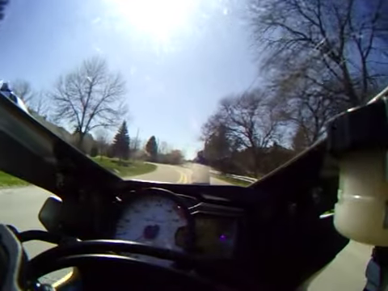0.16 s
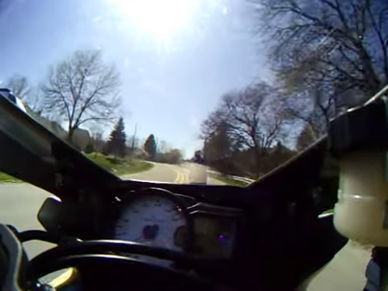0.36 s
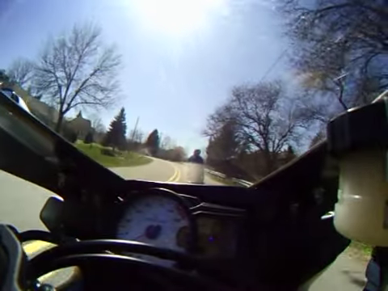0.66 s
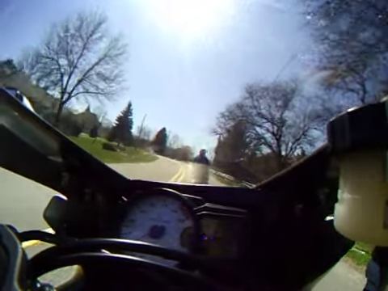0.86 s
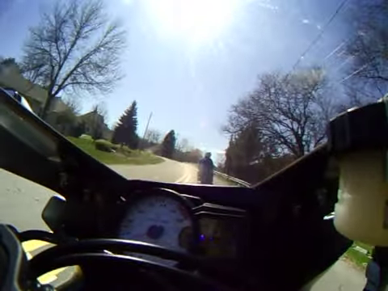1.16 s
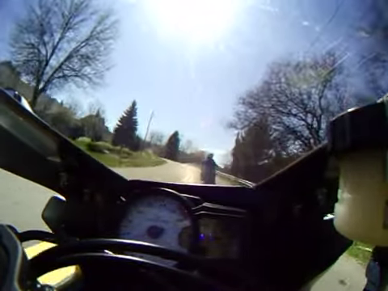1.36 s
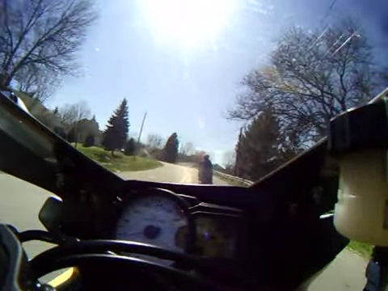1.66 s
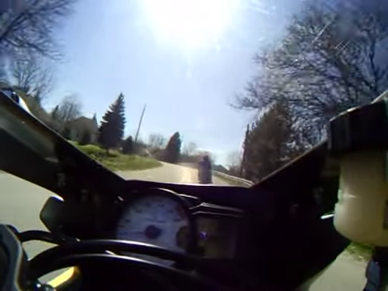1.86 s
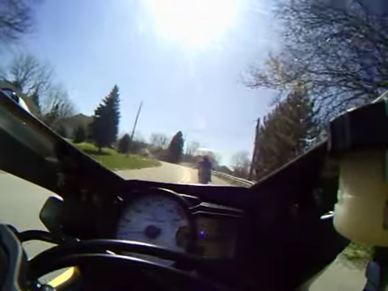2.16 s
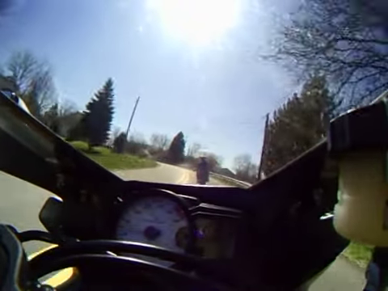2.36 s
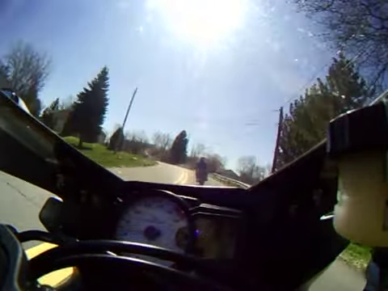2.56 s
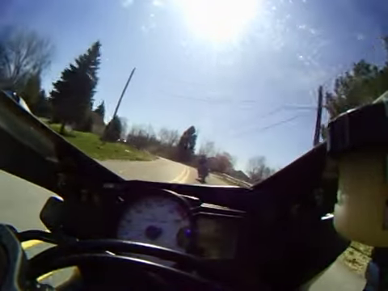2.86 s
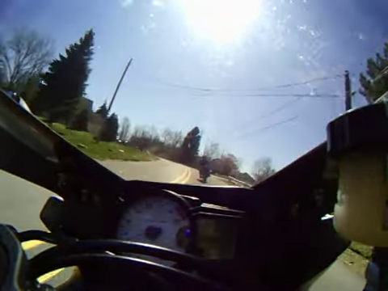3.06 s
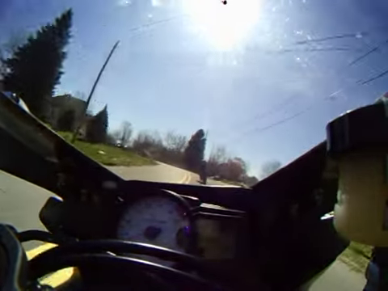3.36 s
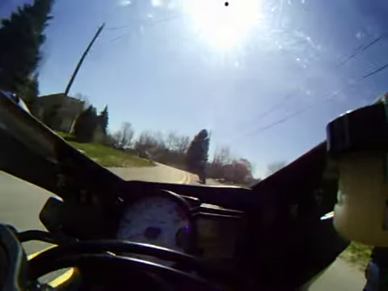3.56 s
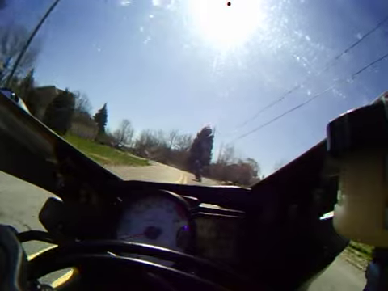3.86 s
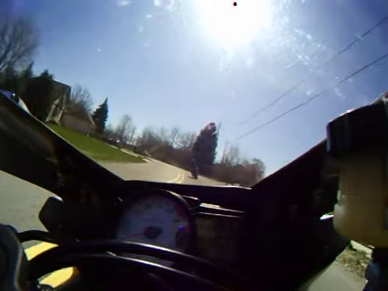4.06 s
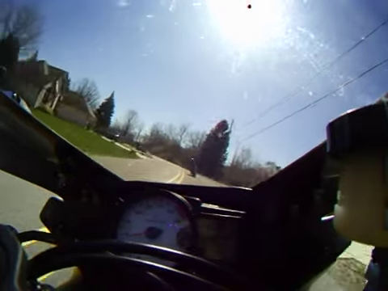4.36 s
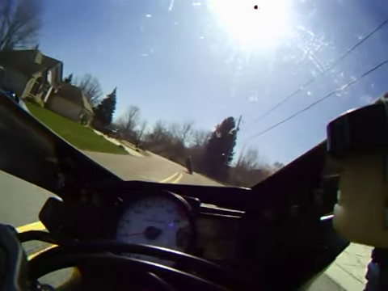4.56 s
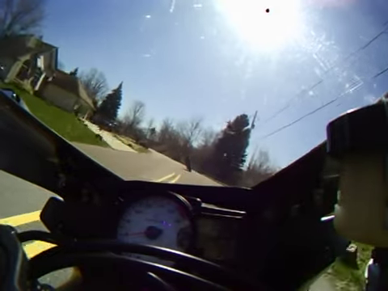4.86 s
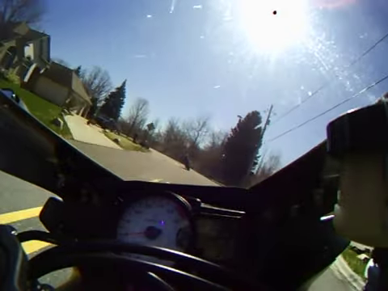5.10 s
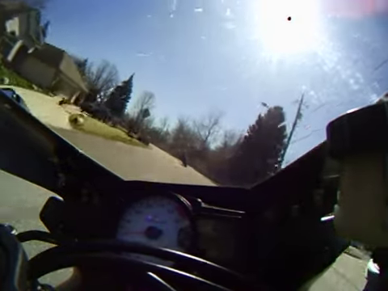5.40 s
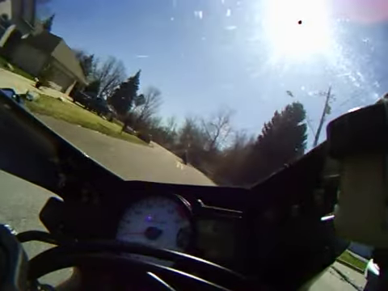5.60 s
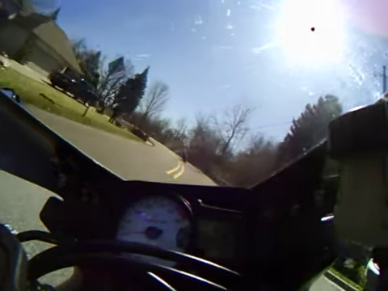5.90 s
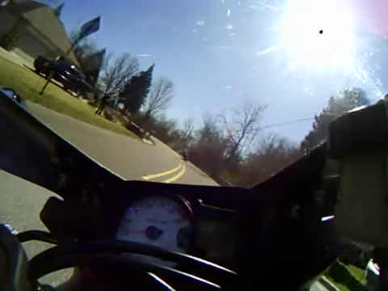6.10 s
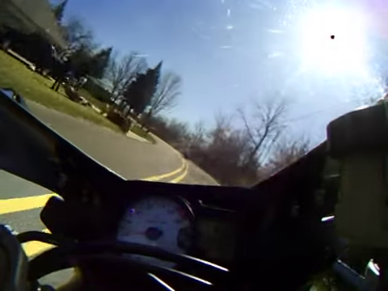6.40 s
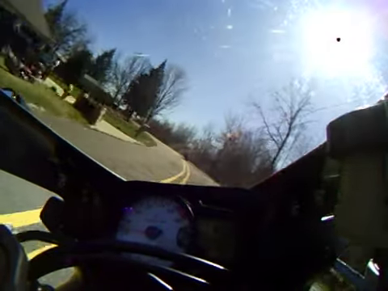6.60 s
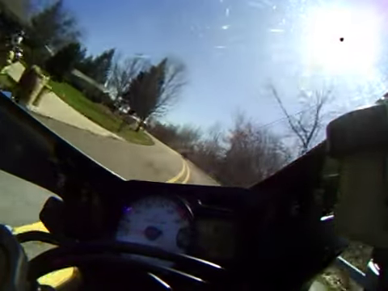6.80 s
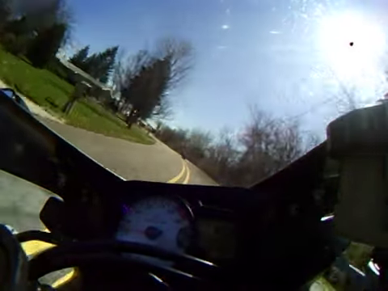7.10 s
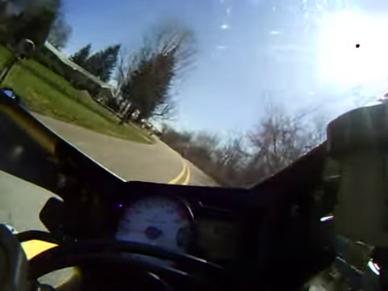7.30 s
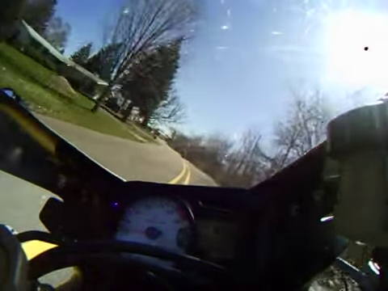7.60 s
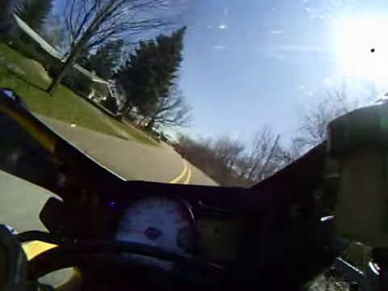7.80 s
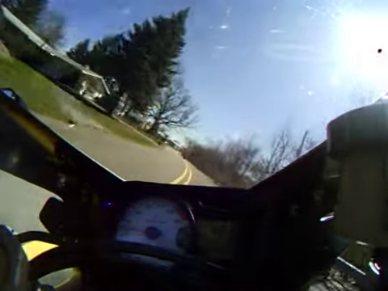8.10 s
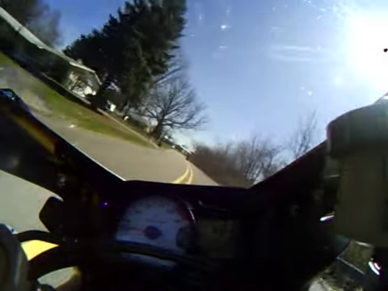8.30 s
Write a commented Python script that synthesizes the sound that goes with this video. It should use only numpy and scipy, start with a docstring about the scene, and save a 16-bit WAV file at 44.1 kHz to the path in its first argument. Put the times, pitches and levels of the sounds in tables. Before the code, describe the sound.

A sport motorcycle growls away from low revs, climbs, shifts up near three seconds, then pulls harder with buzzing, rattling surges and wind.

```python
"""A growl and a low throb open the scene: an inline-four sport motorcycle pulls away, shifts up near 2.8 s
and gathers speed again, heard from behind its windscreen. Each firing is a pulse that rings the airbox, over
a boom at the firing rate; the valve gear whirs as filtered tick noise; surges of vibration set the camera
mount buzzing by impacts. Wind is coloured noise; a narrow-band recorder rounds the peaks."""
import sys
import numpy as np
from scipy import signal
from scipy.fft import rfft, irfft, next_fast_len
from scipy.io import wavfile
from scipy.ndimage import uniform_filter1d

SR = 44100
rng = np.random.default_rng(int(sys.argv[2]) if len(sys.argv) > 2 else 0)


def generate_wav(sig):
    """Save sig (samples, or channels by samples) to the path in sys.argv[1] as 16-bit PCM at SR."""
    pcm = np.round(np.clip(np.atleast_2d(sig).T, -1, 1) * 32767).astype(np.int16)
    wavfile.write(sys.argv[1], SR, pcm)


N = 372644

# strength of the four cylinders in firing order: (in the airbox [dB], in the mount [dB])
CYLINDER_STRENGTHS = [(-1.2, 3), (0, 6), (1, -6), (-2, -1)]
AIRBOX_STRENGTHS, MOUNT_STRENGTHS = 10 ** (np.transpose(CYLINDER_STRENGTHS) / 20)  # as gains
FIRINGS = len(CYLINDER_STRENGTHS)  # firings in one engine cycle
# the upshift, revs drop and the clutch snatches: (time [s], firing rate [Hz], share of ragged firing [0-1])
UPSHIFT_COURSE = [(2.83, 190.9, .05), (2.92, 165.4, 0.5), (3.05, 152.4, 0.4), (3.13, 174.5, .45),
                  (3.2, 157.1, 0.2)]


def undb(db):
    """Level law: decibels to amplitude gain."""
    return 10 ** (np.asarray(db) / 20)


def unit(x):
    """Normalisation: scale to rms 1."""
    return x / np.sqrt(np.mean(x ** 2))


def curves(table):
    """Linear interpolation: each column of a table, joined by straight lines in time."""
    s, *columns = np.transpose(table)
    return [np.interp(np.arange(N) / SR, s, c) for c in columns]


def walk(rate):
    """Slow random modulation: random levels held 1 / rate s, then smoothed by two moving averages."""
    hold = int(SR / rate)
    steps = np.repeat(rng.standard_normal(N // hold + 1), hold)
    return unit(uniform_filter1d(uniform_filter1d(steps, hold), hold)[:N])


def colour(x, points):
    """Minimum-phase filtering: folding the cepstrum makes a causal filter through (Hz, dB) points."""
    size = next_fast_len(N + SR // 2, True) // 2 * 2
    hz, db = np.transpose(points)
    f = np.arange(size // 2 + 1) * SR / size
    gain = undb(np.interp(np.log(f + 1), np.log(hz), db))
    cepstrum = irfft(np.log(gain))
    cepstrum[1:size // 2] *= 2
    cepstrum[size // 2 + 1:] = 0
    return unit(irfft(rfft(x, size) * np.exp(rfft(cepstrum)))[:N])


def resonate(x, modes):
    """Modal superposition: parallel resonances with steep skirts; neighbours swing in opposite sense."""
    total = np.zeros(N)
    for k, (hz, width, db) in enumerate(modes):
        stage = np.concatenate(signal.iirpeak(hz, hz / width, fs=SR))
        total += (-1) ** k * undb(db) * signal.sosfilt([stage] * 2, x)
    return unit(total)


def knocks(phase, sizes, scatter_db, jitter_ms):
    """Impulse train: one pulse a turn of the phase; the sizes repeat, each a little off in size and time."""
    k = np.arange(1, int(phase[-1]))
    chance = rng.standard_normal((len(k), 2))
    jitter = chance[:, 1] * jitter_ms * SR / 10 ** 3
    at = np.clip(np.interp(k, phase, np.arange(N)) + jitter, 0, N - 2)
    size = sizes[k % len(sizes)] * undb(scatter_db * chance[:, 0])
    i = at.astype(int)
    part = at - i  # a pulse between two samples is shared by both
    return np.bincount(i, size * (1 - part), N) + np.bincount(i + 1, size * part, N)


def chatter(pulses, decay_ms, steady):
    """Amplitude-modulated noise: a decaying burst of noise after each pulse, over a steady share."""
    envelope = signal.lfilter([1], [1, -np.exp(-10 ** 3 / (decay_ms * SR))], pulses)
    return unit((unit(envelope) + steady) * rng.standard_normal(N))


def swings(phase, sizes, rebound, scatter_db, jitter_ms):
    """Half-wave antisymmetry: a push and, half a period later, a pull favour the odd harmonics."""
    return knocks(2 * phase, np.outer(sizes, [1, -rebound]).ravel(), scatter_db, jitter_ms)


def lilt(phase, depth):
    """Phase modulation: the crank hurries and lags once in each engine cycle, which splits the harmonics."""
    return phase + depth * np.sin(2 * np.pi * phase / FIRINGS)


def rattle(phase, scatter_db, jitter_ms, count=12):
    """Cyclic repetition: a dense run of small contacts comes round much alike in every engine cycle."""
    sizes = rng.standard_normal(count * FIRINGS)
    return unit(knocks(count * phase, sizes, scatter_db, jitter_ms))


def gearbox():
    """The firing rate climbs, drops at the upshift and climbs again; firings are ragged only in the shift."""
    # engine speed in the lower gear: (time [s], firing rate [Hz])
    low_gear = [(0, 116.9), (.4, 131.6), (.75, 146.3), (1.5, 172.5), (2.2, 194.6), (2.5, 207.9),
                (2.7, 210.8), (2.76, 210.1)]
    # engine speed in the higher gear: (time [s], firing rate [Hz])
    high_gear = [(3.26, 160.1), (3.7, 165.9), (4.4, 175), (5.8, 194.5), (6.4, 200.3), (6.9, 202.6),
                 (7.6, 210.3), (8.45, 223.1)]
    driving = lambda gear: [(s, hz, 0) for s, hz in gear]
    hz, ragged = curves(driving(low_gear) + list(UPSHIFT_COURSE) + driving(high_gear))
    return hz, np.clip(ragged, 0, 1)


def pull_away(phase):
    """Subharmonics of load: the intake resonates to a growl; uneven firings throb below the firing tone."""
    # pulling hard from low revs: (time [s], intake growl [dB], lugging throb before its parts are mixed [dB])
    pull = [(0, -32, -25.5), (.35, -27, -32), (.85, -28.5, -33), (1.15, -34.5, -44), (2.2, -43.5, -46),
            (3, -57, -62)]
    # intake resonances: (centre [Hz], width of each of two stages [Hz], relative level [dB])
    intake = [(329, 63, -5), (626, 67, -2), (960, 120, -4), (1067, 110, -1), (1508, 140, -7.5),
              (2384, 190, -7), (2750, 160, -16.5)]
    growl_db, throb_db = curves(pull)
    gulps = unit(swings(phase, AIRBOX_STRENGTHS, rebound=0.63, scatter_db=3.5, jitter_ms=0.013))
    gulps = gulps + undb(-5.5) * rattle(phase, scatter_db=4.0, jitter_ms=0.045)
    three_per_cycle = np.sqrt(2) * np.sin(2 * np.pi * phase * 3 / FIRINGS)
    rumble_colour = [(45, -37.0), (66, -11.5), (74, -0.5), (84, -13), (130, -35.5), (400, -67.0)]
    rumble = colour(rng.standard_normal(N), rumble_colour)
    throb = undb(-5) * three_per_cycle + undb(-2.0) * rumble
    return undb(growl_db) * resonate(gulps, intake) + undb(throb_db) * throb


def engine(phase, ragged, lean, loose, boom, airbox):
    """Forced resonance: each firing rings the airbox, over a tone lopsided by load; roughness turns to roar."""
    # airbox and pipe resonances: (centre [Hz], width of each of two stages [Hz], relative level [dB])
    airbox_modes = [(325, 43, -19), (567.4, 68, 1.5), (656.2, 78, -5), (949, 67, -7.5), (1018, 40, -14),
                    (1490, 570, -16.5), (2375, 110, -13)]
    loose_roughness = .1  # share of the pulse power that the loose mount breaks into roar
    pulses = unit(knocks(lilt(phase, depth=0.014), AIRBOX_STRENGTHS, scatter_db=0.6, jitter_ms=0.03))
    rough = np.maximum(ragged, loose_roughness * loose)
    gas = np.sqrt(1 - rough) * pulses + np.sqrt(rough) * rng.standard_normal(N)
    turn = 2 * np.pi * phase
    lopsided = np.sin(turn) + undb(-7) * lean * np.sin(2 * turn)
    tone = boom * (1 - ragged) * np.sqrt(2) * lopsided
    return airbox * undb(1.4 * walk(18)) * resonate(gas, airbox_modes) + tone


def wind(loose):
    """Turbulence: eddy noise behind the screen grows with airspeed and buffets harder while the mount is loose."""
    # airspeed past the screen: (time [s], relative speed [ratio])
    airspeed = [(0, 0.47), (2.7, 1.33), (3.3, 0.62), (8.45, 1.164)]
    # colour of the eddies: (frequency [Hz], relative level [dB])
    eddy_colour = [(15, -12.5), (35, 1), (65, -3), (105, -7.5), (200, -6), (400, -16.5), (600, -10),
                   (750, -17), (1500, -29.5)]
    wind_db, buffet_db = -34.5, -32  # wind at relative speed 1; buffeting with the mount fully loose
    speed, = curves(airspeed)
    gusts = undb(0.42 * walk(4.5) + 2.7 * walk(17))
    strength = np.hypot(undb(wind_db) * speed ** 1.4, undb(buffet_db) * loose ** 1.5)
    return gusts * strength * colour(rng.standard_normal(N), eddy_colour)


def whir(phase, hz):
    """Merging impacts: valve gear ticks blur into a rasp; chain resonances grow with engine speed."""
    # colour of the valve gear: (frequency [Hz], relative level [dB])
    whir_colour = [(410, -32.5), (600, 7), (740, -6), (880, 0), (1060, 7), (1150, -9), (1260, 3),
                   (1400, -10.5), (1560, -10), (2160, -7), (2420, -0.5), (2900, -5.5), (3500, -13.5),
                   (4200, -36)]
    ticks = knocks(phase, AIRBOX_STRENGTHS, scatter_db=4, jitter_ms=0.37)
    contacts = rattle(phase, scatter_db=2.5, jitter_ms=0.051, count=16)
    rasp = unit(chatter(ticks, decay_ms=3.1, steady=0.13) + undb(-3.5) * contacts)
    chain = resonate(rasp, [(1523, 150, 0.0057), (1842, 240, 0)])
    return colour(rasp, whir_colour) + undb(-6.5) * (hz / hz.mean()) ** 5 * chain


def surges():
    """Exponential growth and decay: each surge swells, holds and dies away; the strongest one rules."""
    # surges in which the mount shakes loose:
    # (full strength at [s], hold [s], rise constant [s], fall constant [s], level [dB])
    surge_times = [(2.298, .08, 0.068, 0.036, -22.5), (2.507, 0.037, 0.094, 0.018, -13),
                   (2.596, 0.067, 0.035, 0.012, -13.5), (2.776, 0.045, 0.0337, 0.014, -13.5),
                   (4.58, 0.091, .08, .03, -30), (4.936, 0.086, 0.045, 0.052, -24),
                   (5.349, 0.087, 0.19, 0.15, -21), (5.759, 0.062, .14, 0.09, -16.5),
                   (6.123, 0.066, 0.095, 0.05, -13), (6.408, .15, 0.042, 0.036, -11.5),
                   (6.662, .04, 0.018, 0.065, -17.5), (6.788, 0.18, 0.041, 0.043, -12.5),
                   (7.115, 0.022, 0.033, 0.02554, -14.5), (7.199, 0.12, .05, 0.053, -12),
                   (7.451, 0.0097, 0.0066, .012, -18.5), (7.532, 0.11, 0.0205, 0.0316, -13.5),
                   (7.879, 0.01964, 0.0191, 0.0128, -20.5), (7.956, 0.052, 0.0137, 0.013, -10.5)]
    t = np.arange(N) / SR
    strongest = np.zeros(N)
    for at, hold, rise, fall, db in surge_times:
        swell = np.minimum((t - at) / rise, 0)
        fade = np.minimum((at + hold - t) / fall, 0)
        strongest = np.maximum(strongest, undb(db) * np.exp(swell + fade))
    return strongest


def pressure(hz):
    """Static preload: the mount leans on one stop, 0-1, more in the lower gear and more as revs fall."""
    low_gear_press, high_gear_press = .42, .08  # share by which the drive presses the mount
    overrun_hz_per_s = 300  # fall of the firing rate that adds a full share
    drive = np.where(np.arange(N) / SR < UPSHIFT_COURSE[-1][0], low_gear_press, high_gear_press)
    overrun = np.maximum(-np.gradient(hz) * SR / overrun_hz_per_s, 0)
    return np.clip(drive + overrun, 0, .88)


def buzz(phase, lean):
    """Vibro-impact: the loose mount hits both stops, bounces and scrapes; pressed on one it knocks cleanly."""
    # colour of the mount: (frequency [Hz], relative level [dB])
    mount_colour = [(100, -31), (295, -12.5), (350, -2), (405, -3.5), (460, -3.5), (510, -7), (565, 7.5),
                    (700, -10.5), (820, -1.5), (900, -4.5), (1010, -1), (1120, -3), (1240, 0), (1370, -3.5),
                    (1580, -1), (1900, 3.5), (2150, -4), (2430, 7), (2650, 0.5), (3000, -0.5),
                    (4200, -18.5)]
    hits = swings(lilt(phase, depth=.022), MOUNT_STRENGTHS, rebound=0.65, scatter_db=2.5, jitter_ms=0.046)
    thud = unit(signal.lfilter(*signal.butter(2, 1300, fs=SR), hits - hits.mean()))
    bounces = rattle(phase, scatter_db=2.82, jitter_ms=0.069, count=20)
    rubs = knocks(phase, MOUNT_STRENGTHS, scatter_db=4.5, jitter_ms=0.34)
    scrape = chatter(rubs, decay_ms=2.4, steady=0.75)
    scrape = signal.lfilter(*signal.butter(1, 900, "high", fs=SR), scrape)
    flutter = undb(2.1 * walk(70))
    free = undb(-10.5) * thud + flutter * (undb(-1.5) * bounces + scrape)
    pressed = undb(2.5) * unit(knocks(phase, np.ones(1), scatter_db=1.5, jitter_ms=.035))
    return colour(np.sqrt(1 - lean) * free + np.sqrt(lean) * pressed, mount_colour)


def shudder(phase, hz, free):
    """Driven resonance: the freed mount rocks once an engine cycle, most when that rate meets its own."""
    # overtones of the rocking: (multiple of the engine cycle rate [ratio], relative level [dB])
    overtones = [(1, 0.5), (2, -19.5), (3, -14), (5, -14.5), (7, -11), (9, -9.5), (11, -10), (13, -23)]
    rock_hz, rock_width_hz, rock_db = 51.04, 4.12, -18
    wander_rad = .55  # rms phase wander of each overtone
    response = 1 / np.hypot(1, 2 * (hz / FIRINGS - rock_hz) / rock_width_hz)
    turn = 2 * np.pi * phase / FIRINGS
    rocking = np.zeros(N)
    for multiple, db in overtones:
        rocking += undb(db + 2 * walk(24)) * np.sin(round(multiple) * turn + wander_rad * walk(30))
    return undb(rock_db) * response * np.maximum(free, 0) ** 1.22 * rocking


def scene():
    """Synchrony: engine speed times every engine layer; surges swell the boom and shake the mount loose."""
    # steady running between the surges, before the gains below:
    # (time [s], boom at the firing rate [dB], clatter [dB], airbox [dB])
    running = [(0.0, -37.5, -33.5, -32), (0.64, -34, -32, -45.5), (1.01, -28.5, -29.5, -29.5),
               (1.22, -27, -28.5, -25), (1.84, -33, -29.5, -34.5), (2.26, -25, -29, -27.5),
               (2.47, -22, -23.5, -20), (2.66, -23.5, -24.5, -37), (2.85, -33.5, -28.5, -27),
               (3.08, -33.5, -30, -28), (3.41, -30, -28.5, -26), (3.97, -29.5, -28.5, -32),
               (4.87, -30, -27.5, -28), (5.36, -29, -29, -27), (7.06, -22.5, -19, -28.5),
               (7.55, -24.5, -23, -29.5), (8.45, -24, -23, -32.5)]
    boom_gain_db, clatter_gain_db, airbox_gain_db = -0.5, 0.5, 0.5
    surge_boom_db, surge_airbox_db = -1.3, -12  # carried by a surge, against its clatter
    loose_above_db = -25.5  # clatter level at which the mount is half loose

    hz, ragged = gearbox()
    phase = np.cumsum(hz * (1 + 0.001533 * walk(25))) / SR  # in firings
    boom_db, clatter_db, airbox_db = curves(running)
    surge, lean = surges(), pressure(hz)
    boom = np.hypot(undb(boom_db + boom_gain_db), undb(surge_boom_db) * surge)
    airbox = np.hypot(undb(airbox_db + airbox_gain_db), undb(surge_airbox_db) * surge)
    shaking = np.hypot(undb(clatter_db + clatter_gain_db), surge)
    loose = 1 / (1 + (undb(loose_above_db) / shaking) ** 1.67)

    whirring = undb(0.14) * np.sqrt(1 - loose) * whir(phase, hz)
    buzzing = undb(1.0) * np.sqrt(loose) * buzz(phase, lean)
    rocking = shudder(phase, hz, loose * (1 - lean) ** 1.2)
    motor = engine(phase, ragged, lean, loose, boom, airbox) + pull_away(phase)
    return (motor + shaking * (whirring + buzzing) + rocking + wind(loose))[None]


def record(dry):
    """Saturation and band limiting: loud peaks are rounded, the band kept narrow, the highest crests clipped."""
    top_hz, final_hz = 4050, 15800  # edge of the narrow band; edge of the filter after the clipping
    ceiling = 0.63
    rounded = ceiling * np.tanh(dry / ceiling)
    lowpass = signal.firwin(141, top_hz, window=("kaiser", 7), fs=SR)
    narrow = signal.fftconvolve(rounded, lowpass[None], mode="same", axes=1)
    clipped = np.clip(narrow, -.69, .69)  # a clipped crest leaves a faint tick
    return signal.sosfilt(signal.ellip(8, .2, 70, final_hz, fs=SR, output="sos"), clipped)


dry = scene()
out = record(dry)
generate_wav(out)
```